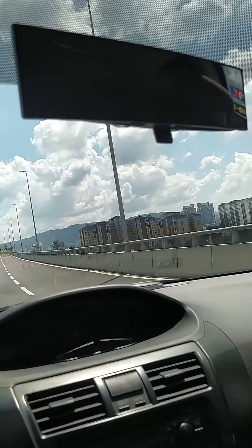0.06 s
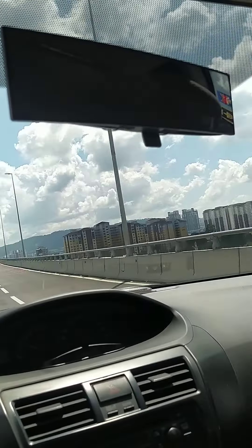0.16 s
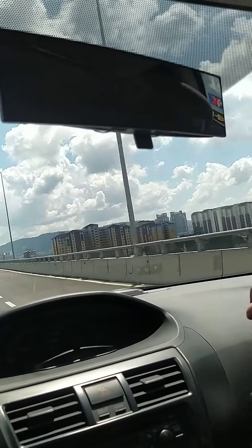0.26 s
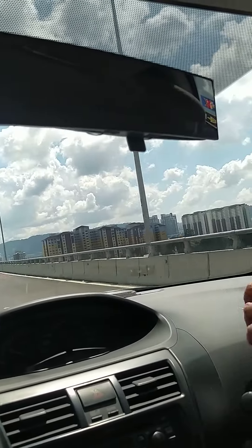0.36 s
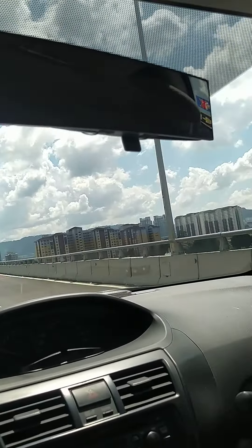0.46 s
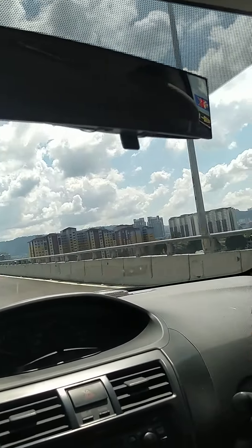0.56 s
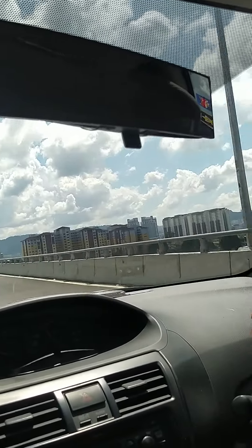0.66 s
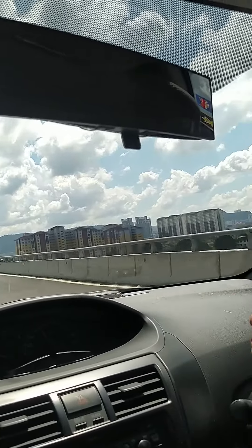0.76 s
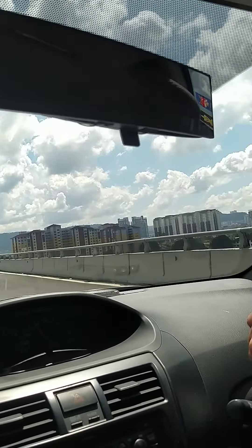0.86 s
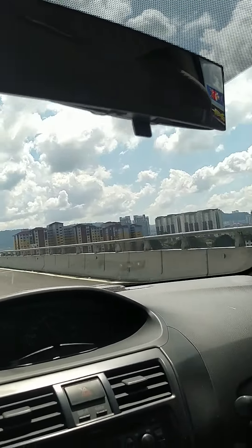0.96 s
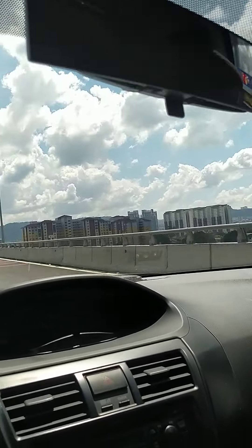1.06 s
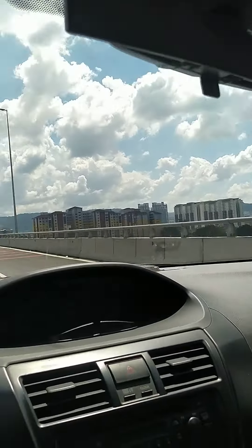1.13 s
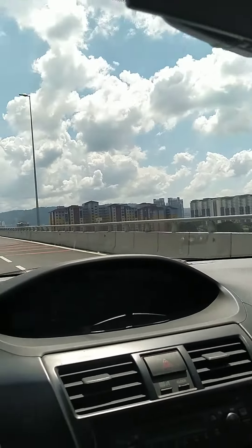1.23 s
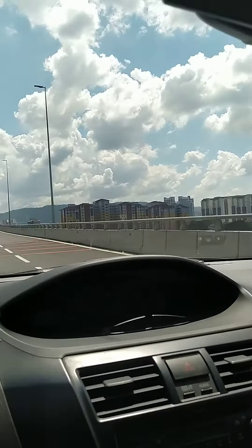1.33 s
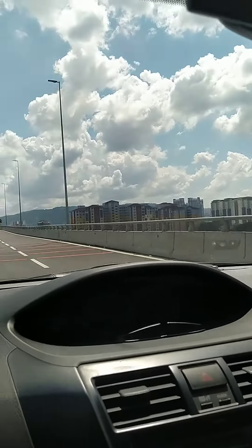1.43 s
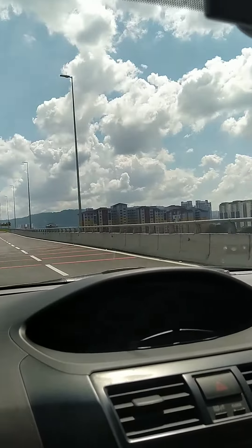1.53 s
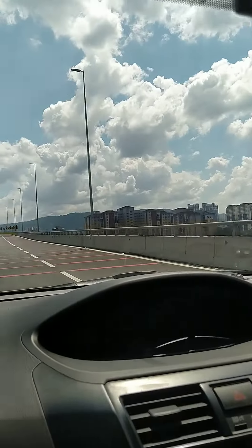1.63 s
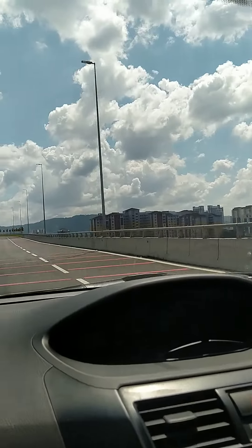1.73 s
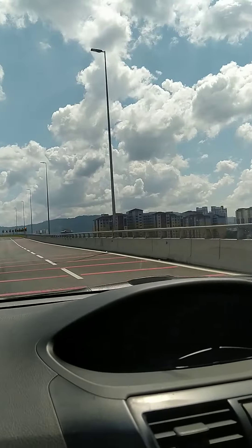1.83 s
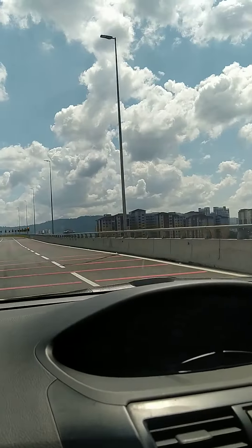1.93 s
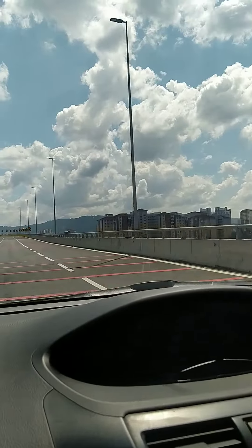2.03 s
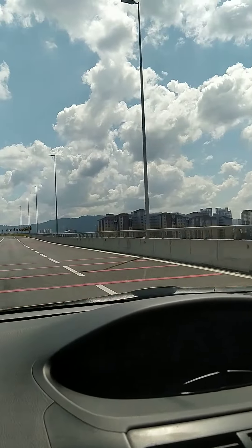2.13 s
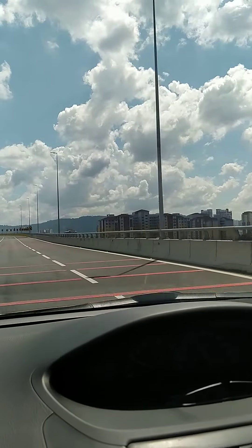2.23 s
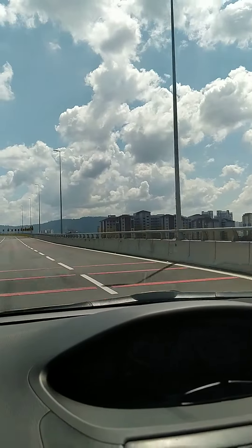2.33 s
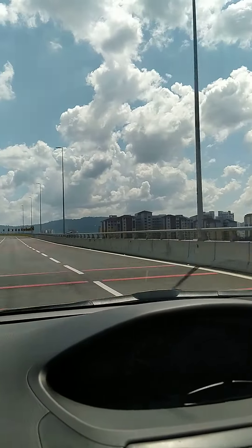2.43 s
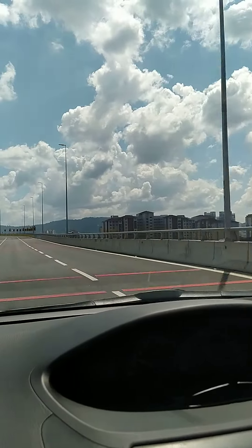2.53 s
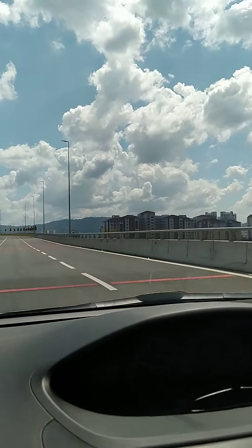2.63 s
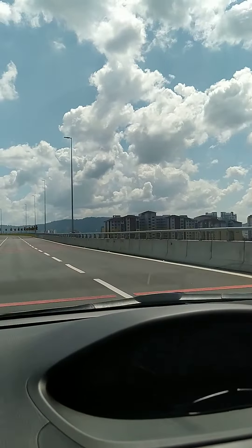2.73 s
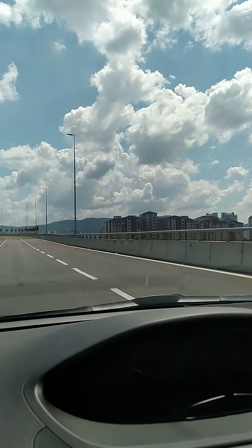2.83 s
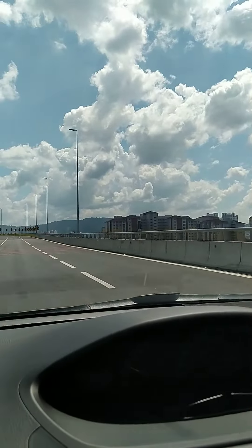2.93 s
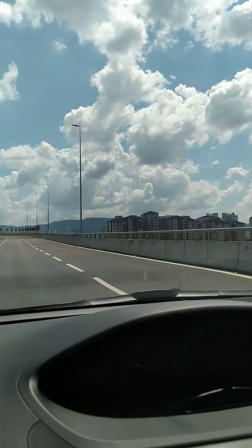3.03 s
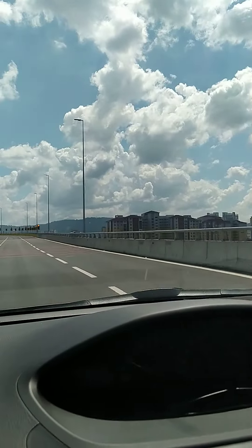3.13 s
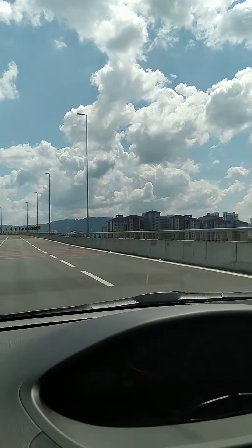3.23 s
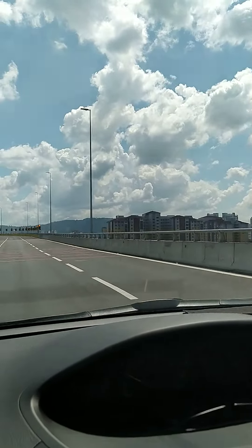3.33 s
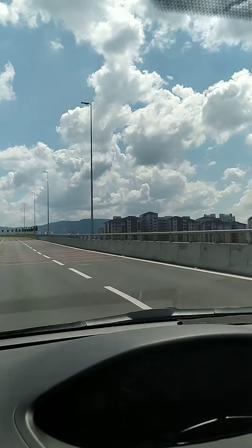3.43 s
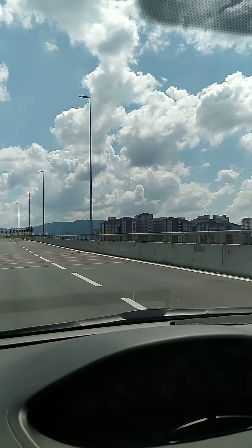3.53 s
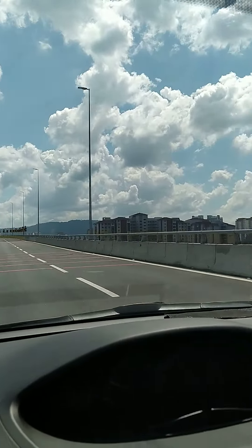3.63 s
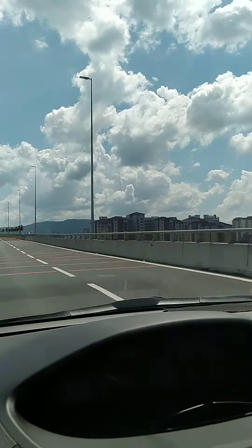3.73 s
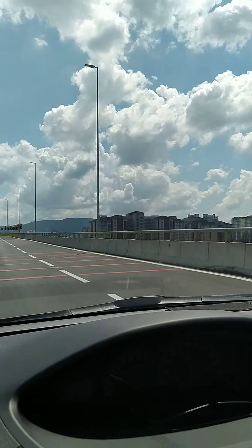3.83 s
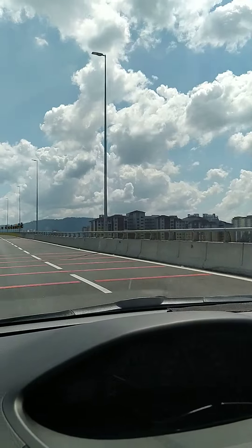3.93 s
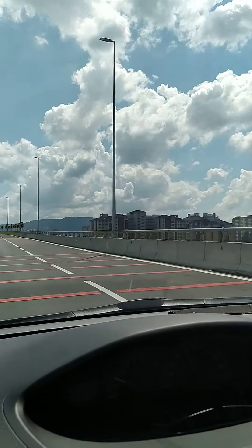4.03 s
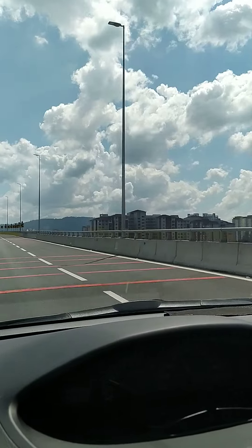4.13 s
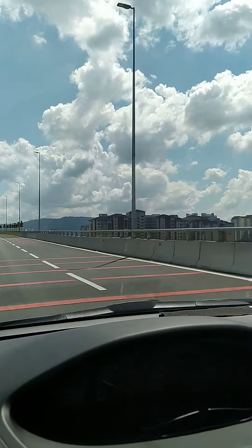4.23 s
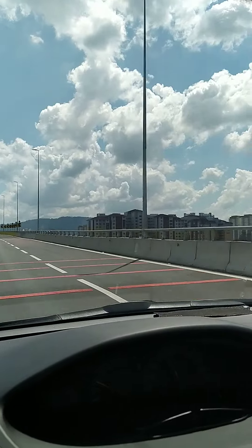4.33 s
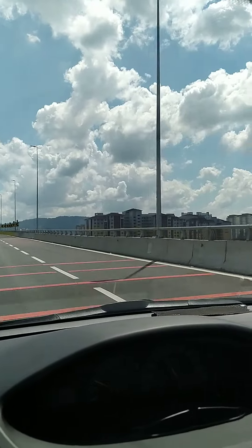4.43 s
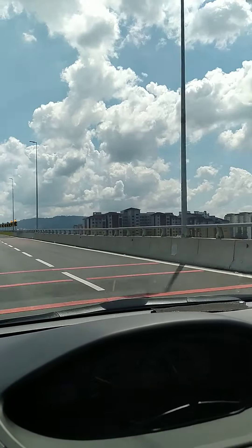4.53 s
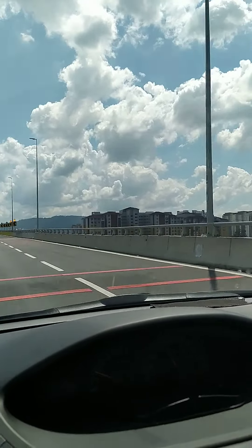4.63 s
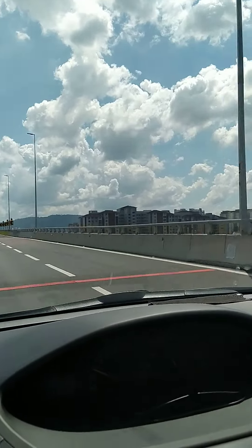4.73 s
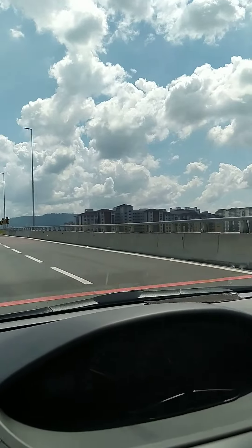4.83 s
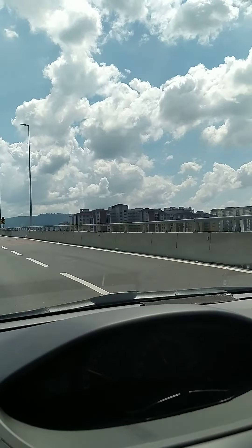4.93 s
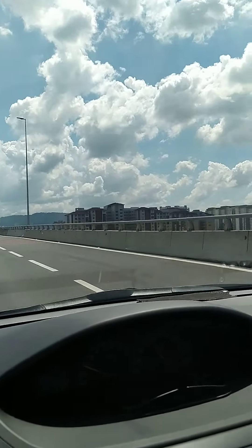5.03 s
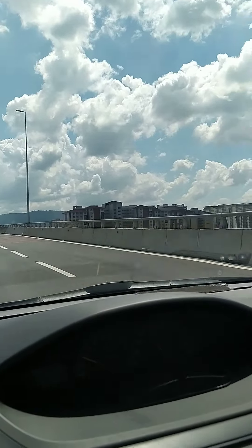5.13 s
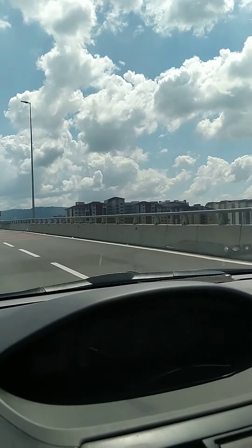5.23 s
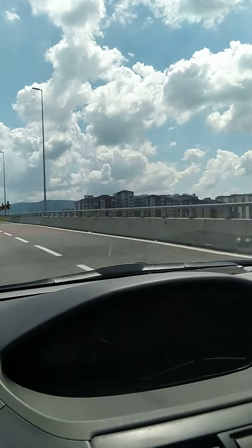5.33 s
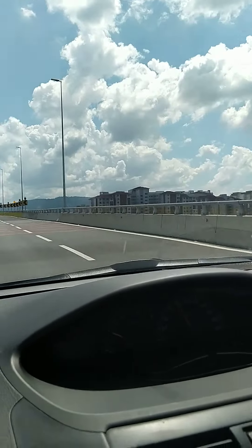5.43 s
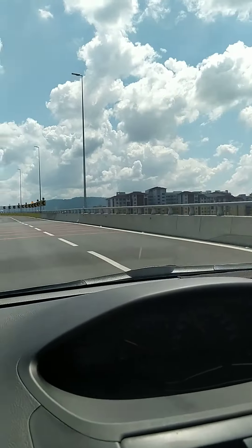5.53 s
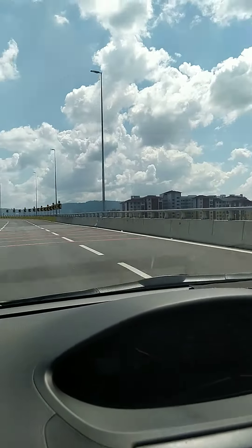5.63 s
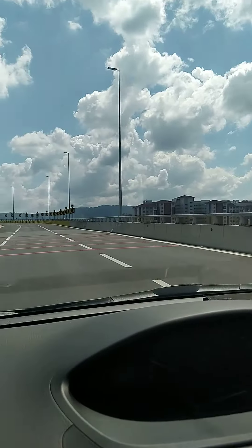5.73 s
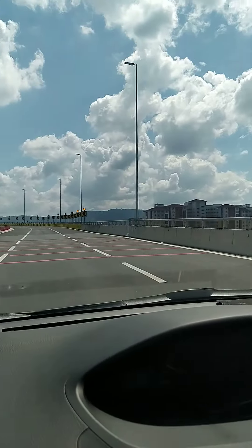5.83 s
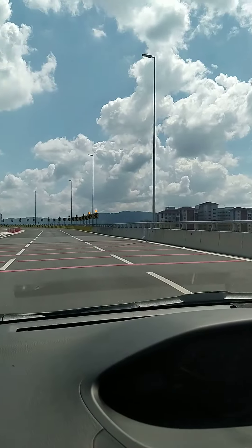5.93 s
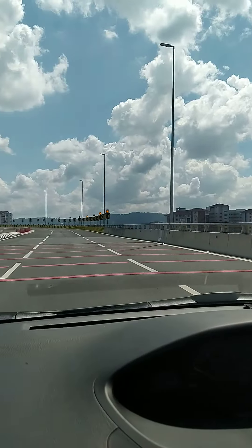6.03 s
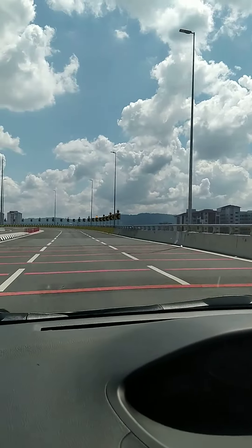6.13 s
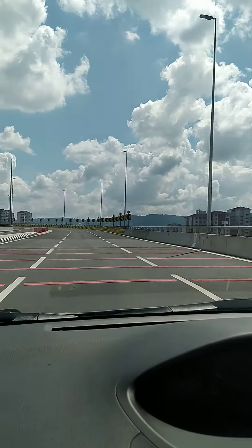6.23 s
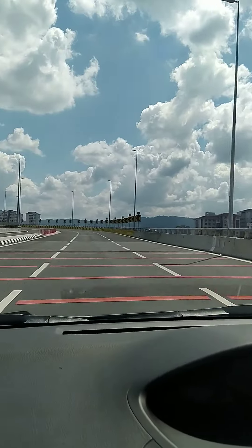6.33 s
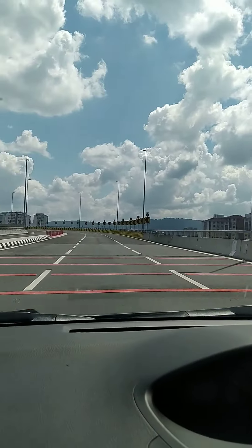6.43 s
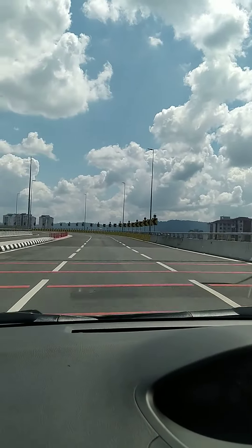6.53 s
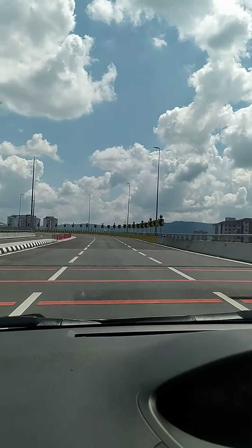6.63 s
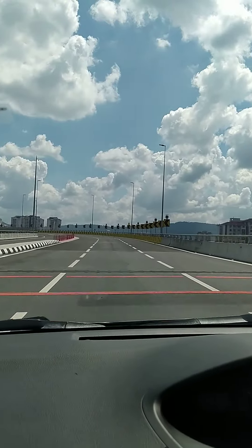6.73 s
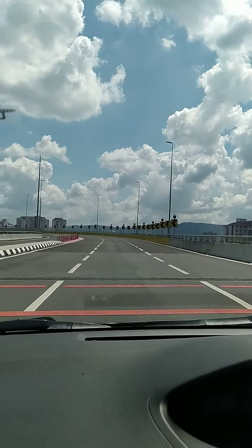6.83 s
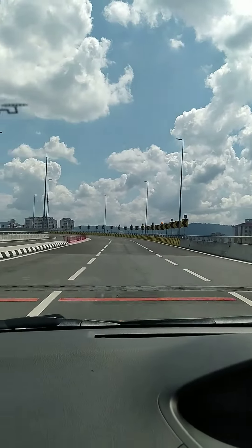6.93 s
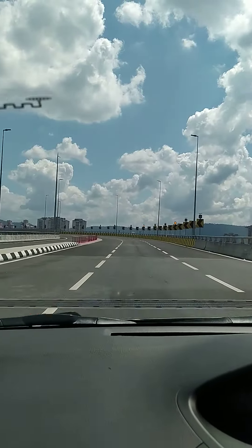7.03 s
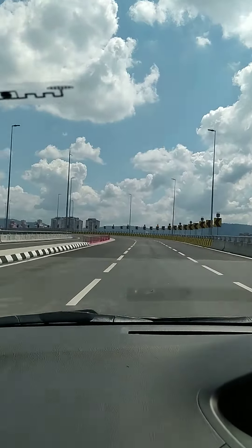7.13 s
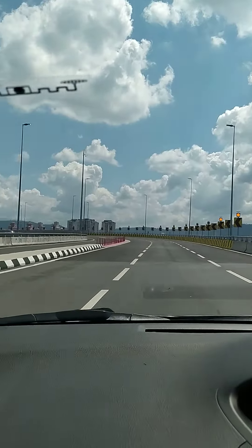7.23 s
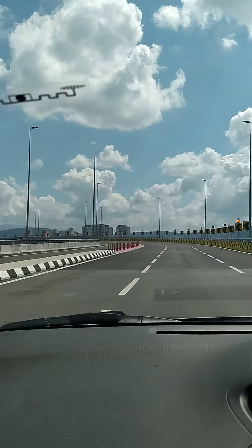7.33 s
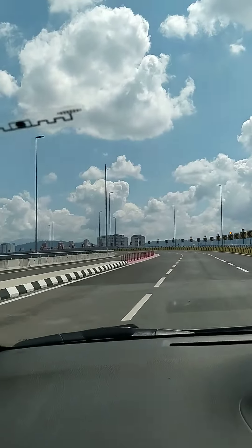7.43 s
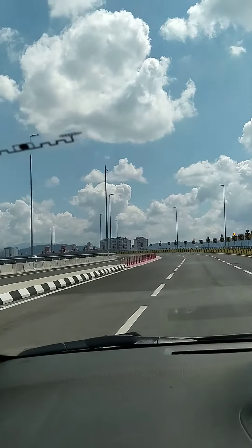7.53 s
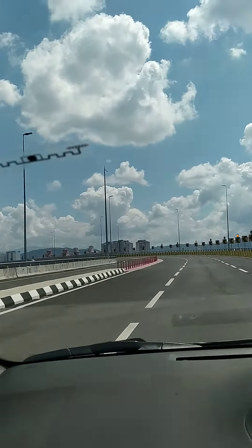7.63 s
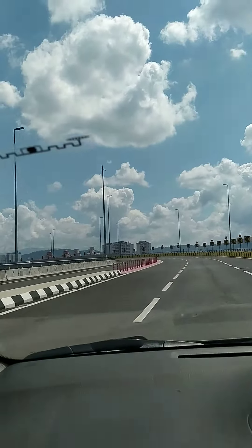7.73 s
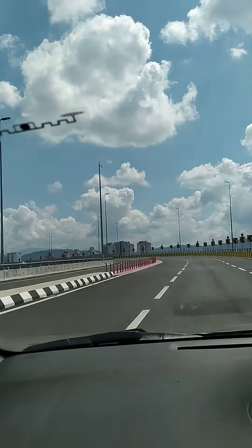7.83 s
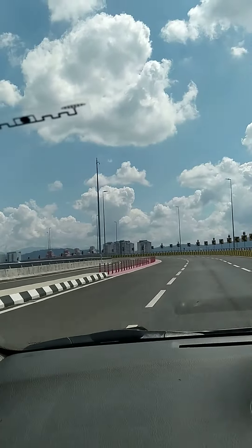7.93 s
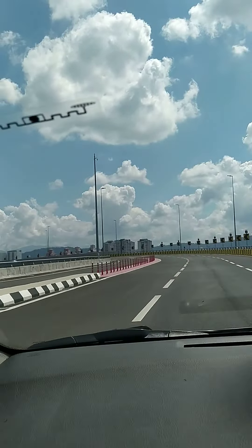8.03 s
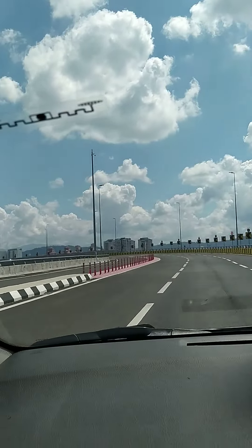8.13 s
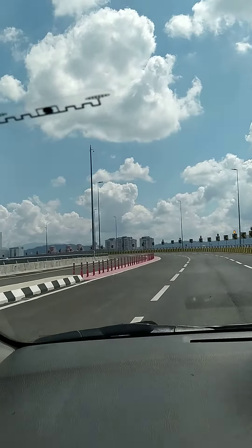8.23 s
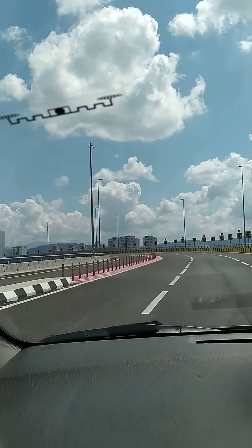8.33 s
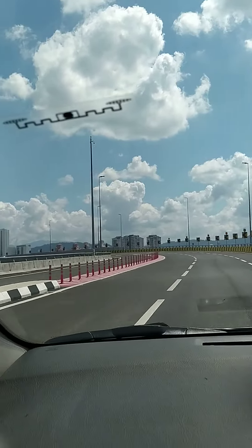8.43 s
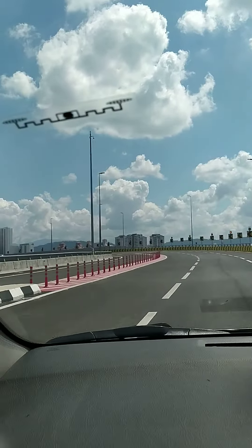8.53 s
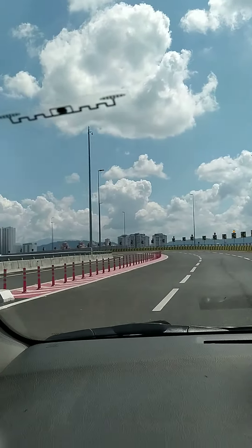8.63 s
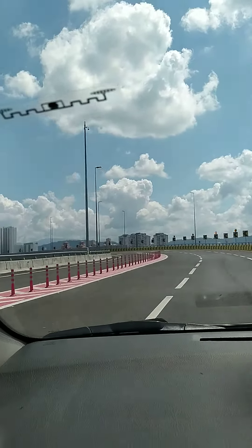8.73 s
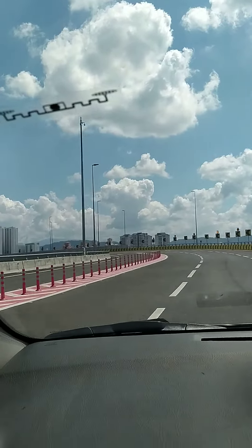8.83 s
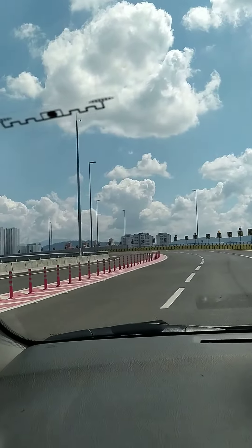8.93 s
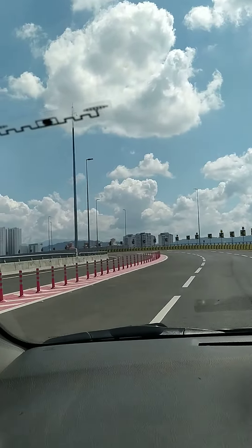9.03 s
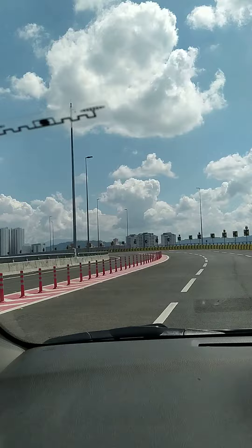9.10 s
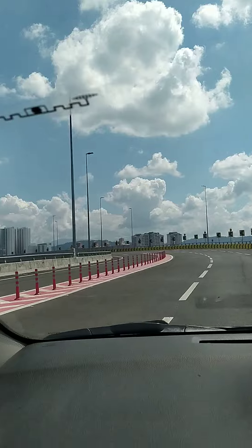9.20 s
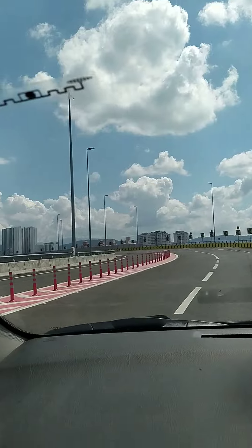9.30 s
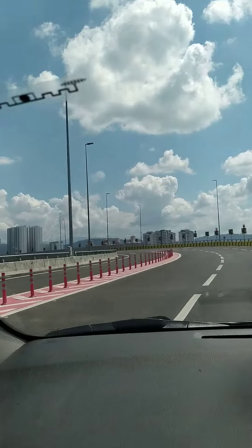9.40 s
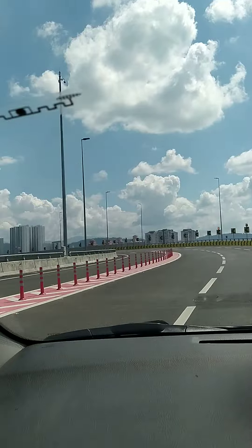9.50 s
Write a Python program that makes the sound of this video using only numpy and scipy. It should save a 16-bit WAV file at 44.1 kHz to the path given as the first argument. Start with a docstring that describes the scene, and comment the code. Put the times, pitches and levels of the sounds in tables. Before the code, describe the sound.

A closed car cabin on a highway, microphone near the dashboard. Soft rustles of handling begin over smooth road noise, which soon turns coarser. Three times the tyres drum rapidly across painted strips, front wheels slapping, rear wheels thudding, the body booming and plastic trim chattering. Between the bursts there is only steady roar, hum and hiss. A scrape and click precede the last set; a soft tick comes near the end.

```python
"""Tyres slap three sets of six painted rumble strips, heard inside a small car on a highway.
Each blow is shaped noise and fading tones: the front tyres knock and slap, the rear ones thump and thud.
Both make the body boom; loose trim rattles afterwards as bursts of noise.
Underneath run road roar and air hiss (noise), droning resonances, engine hum and a gear whine (sines).
Close by are rustles, a scrape that ends in a plastic click, and a soft tick (noise, with tones in the click)."""
import sys
import numpy as np
from scipy import signal
from scipy.fft import rfft, irfft
from scipy.io import wavfile
from scipy.ndimage import uniform_filter1d

SR = 44100
rng = np.random.default_rng(int(sys.argv[2]) if len(sys.argv) > 2 else 0)


def wrap_up_sound(samples):
    """Save the sound to the file named by the first command line argument, as 16-bit audio."""
    columns = np.atleast_2d(samples).T
    # keep every value between -1 and 1, then stretch to whole-number steps
    tamed = np.clip(columns, -1, 1)
    steps = np.round(tamed * 32767).astype(np.int16)
    wavfile.write(sys.argv[1], SR, steps)


N = 421596  # samples, about 9.56 s
TIME = np.arange(N) / SR


def undb(db):
    """Turn decibels into a gain."""
    return 10 ** (np.asarray(db) / 20)


def noise(size):
    """Two unrelated channels of white noise."""
    return rng.standard_normal((2, size))


def curves(table):
    """Join each column of a table by straight lines in time."""
    s, *columns = np.transpose(table)
    return [np.interp(TIME, s, column) for column in columns]


def ramp(s, fade_s):
    """Rise from 0 to 1 around a time."""
    return np.clip((TIME - s) / fade_s + .5, 0, 1)


def walk(rate_hz):
    """A wandering level: random steps smoothed twice, with a spread of 1."""
    step = int(SR / rate_hz)
    held = np.repeat(rng.standard_normal(N // step + 1), step)
    smooth = uniform_filter1d(uniform_filter1d(held, step), step)[:N]
    return smooth / smooth.std()


def log_frequency(size):
    """Logarithm of each spectrum frequency, because pitch is heard in ratios."""
    return np.log(np.maximum(np.fft.rfftfreq(size, 1 / SR), 1))


def colour(x, points):
    """Shape a sound by a spectrum with steep ends; white noise keeps its power."""
    hz, db = np.transpose(points)
    f = log_frequency(x.shape[-1])
    outside = np.abs(f - np.clip(f, np.log(hz[0]), np.log(hz[-1])))
    gain = undb(np.interp(f, np.log(hz), db)) * np.exp(-10 * outside)
    gain = gain / np.sqrt(np.mean(gain ** 2))
    return irfft(rfft(x) * gain, x.shape[-1])


def lows(x, top_hz):
    """Keep what lies below a frequency, without delaying it."""
    return signal.sosfiltfilt(signal.butter(2, top_hz, fs=SR, output="sos"), x)


def fade(t, t60):
    """Die away by 60 dB in t60 seconds."""
    return np.exp(-np.log(1000) * t / t60)


def add(out, sound, s):
    """Mix a sound in at a time."""
    start = int(s * SR)
    part = sound[..., :N - start]
    out[..., start:start + part.shape[-1]] += part


def ring(modes, detune):
    """One second of fading tones, as from a struck object; pitches differ a little at every blow."""
    t = TIME[:SR]
    out = np.zeros(SR)
    for hz, db, t60 in modes:
        pitch_hz = hz * (1 + detune * rng.standard_normal())
        out += undb(db - 60 * t / t60) * np.sin(2 * np.pi * pitch_hz * t)
    return out


DRONE_WIDTH_HZ = 5
# narrow resonances of tyres and cabin that the asphalt keeps droning: (frequency [Hz], level [dB])
DRONES = [(102, -40), (158, -40.5), (222, -47.5), (243, -42), (286, -45.5), (370, -48)]


def drones():
    """Narrow bands of noise, like resonances kept going by the road, each swelling and fading on its own."""
    f = np.fft.rfftfreq(N, 1 / SR)
    power = 0
    for hz, db in DRONES:
        peak = 1 / (1 + ((f - hz) / DRONE_WIDTH_HZ) ** 2) ** 2
        power = power + undb(db) ** 2 * peak / peak.mean()
    return irfft(rfft(noise(N)) * np.sqrt(power), N)


ROAD_DB, AIR_DB = -26.5, -53.5  # base levels
ASPHALT_S, ASPHALT_FADE_S = 2.2, 1  # the road turns coarser here
SMOOTH_RUMBLE_DB, SMOOTH_ROAR_DB, SMOOTH_DRONE_DB = -2, -2, -5  # on the smooth stretch before it
BEND_S, BEND_FADE_S, BEND_ROAR_DB = 8.34, 0.21, 2  # steering into the bend loads the tyres
# tone of the road and tyre noise: (frequency [Hz], relative level per Hz [dB])
ROAD = [(18, 3.5), (27, -0.5), (45, 1), (72, -7.5), (92, -8.5), (120, -3), (145, -10.5), (185, -6),
        (215, -10.5), (260, -12.5), (330, -17.5), (580, -25), (820, -26.5), (1300, -35.5), (2500, -49)]
# tone of the air hiss: (frequency [Hz], relative level per Hz [dB])
AIR = [(1470, 6), (2500, 2), (3440, -3.5), (4270, -2.5), (5120, -7), (9660, -1.5), (11400, -15.5),
       (13600, -22), (15500, -43)]


def road():
    """Asphalt rumbles through the suspension, the tread roars above it and air hisses almost steadily."""
    smooth, bend = 1 - ramp(ASPHALT_S, ASPHALT_FADE_S), ramp(BEND_S, BEND_FADE_S)
    tyres = undb(ROAD_DB) * colour(noise(N), ROAD)
    low = lows(tyres, 340)
    rumble = low * undb(SMOOTH_RUMBLE_DB * smooth - 1.4 + 1.1 * walk(11))
    roar_db = SMOOTH_ROAR_DB * smooth + BEND_ROAR_DB * bend + 1.13 + .5 * walk(14)
    roar = (tyres - low) * undb(roar_db)
    # in the bend the loaded tread roars more around a kilohertz
    scrub = bend * undb(-48) * colour(noise(N), [(700, 6), (1030, 4), (1600, -25)])
    air = colour(noise(N), AIR) * undb(AIR_DB - 0.22 + .5 * walk(2.88))
    return rumble + roar + scrub + air + drones() * undb(SMOOTH_DRONE_DB * smooth)


# engine speed and loudness: (time [s], firing rate [Hz], base hum level [dB])
ENGINE = [(0, 59.5, -38), (.8, 60.6, -36.5), (1.4, 61.7, -32.5), (2.3, 61.7, -31.5), (3.8, 61.7, -46),
          (5.4, 61.7, -38), (6.3, 62.2, -37), (8.2, 59.2, -35), (9.56, 59.2, -36)]
# tones that make up the hum: (multiple of the firing rate, relative level [dB])
ENGINE_ORDERS = [(1, -8), (2, 0), (3, -2.5), (4, -13)]


def engine():
    """Regular firing makes a stack of harmonics; the gear whine is locked to the same turning."""
    firing_hz, hum_db = curves(ENGINE)
    phase = 2 * np.pi * np.cumsum(firing_hz * (1 + .001 * walk(6))) / SR
    hum = sum(undb(hum_db + db + walk(2.94)) * np.sin(k * phase) for k, db in ENGINE_ORDERS)
    return hum + gear_whine(phase)


WHINE_ORDER = 13  # gear teeth per firing
# the whine swells once under load: (time [s], level [dB])
WHINE = [(0, -58), (.55, -51), (.95, -48), (1.35, -45), (1.7, -45), (1.95, -48), (2.3, -52), (2.6, -70)]


def gear_whine(phase):
    """Meshing teeth sing one thin tone, a little unsteady in pitch and level."""
    whine_db, = curves(WHINE)
    tone = np.sin(WHINE_ORDER * phase + .6 * walk(35))
    return tone * undb(whine_db + 2 * walk(25))


# when something rustles: (time [s], time from the middle until it has faded to 37 % [s], level [dB])
RUSTLES = [(0.051, 0.03, -50.5), (0.085, 0.0073, -48), (0.182, 0.12, -54.5), (4.162, 0.046, -49),
           (7.239, 0.024, -43)]
# tone of the rustles: (frequency [Hz], relative level per Hz [dB])
RUSTLE_TONE = [(3000, -8), (4500, -6), (6500, -3.5), (9500, 3), (11500, -9), (15000, -30)]


def rustles():
    """Short dry rubbing close by: noise that flutters quickly in level."""
    rub = sum(undb(db) * np.exp(-((TIME - s) / length_s) ** 2) for s, length_s, db in RUSTLES)
    return colour(noise(N) * rub * undb(1.6 * walk(430)), RUSTLE_TONE)


# sets of evenly spaced strips: (time the front tyres meet the first [s], time between strips [s])
STRIP_SETS = [(2.454, .158), (4.545, .1563), (6.637, .1567)]
# how hard the paint of each set is struck: (knock level [dB], slap level [dB], rear blow level [dB])
BLOWS = [(-21.5, -16.5, 1), (-21.5, -15.5, 1), (-23, -17, 1.2)]
# how hard each strip shakes the trim, one row per set: (level at first [dB], ... level at sixth [dB])
SHAKE = [(-29.5, -31, -31.5, -31, -26, -32), (-37.5, -30.5, -31.5, -32.5, -32.5, -31.5),
         (-34, -33.5, -29, -32, -30, -33)]


def crossings():
    """List every strip: (time [s], knock [dB], slap [dB], rear blow [dB], trim shake [dB])."""
    strips_met = []
    for (first_s, gap_s), blow, shakes in zip(STRIP_SETS, BLOWS, SHAKE):
        for k, shake_db in enumerate(shakes):
            strips_met.append((first_s + k * gap_s, *blow, shake_db))
    return strips_met


# rough part of a tyre knock: (frequency [Hz], relative level per Hz [dB])
KNOCK_TONE = [(400, -9), (530, -8), (720, 6.5), (880, -1), (1050, -10), (1350, -11), (2200, -26)]
# hollow ring of the wheel arch: (frequency [Hz], relative level [dB], time to fade by 60 dB [s])
ARCH = [(672, -2, .08), (764, 0, .075)]


def knock(t60=0.092, grip_s=0.0032, rough_db=-4, arch_db=-2):
    """The tread wraps round the edge of the paint in a rough knock and the wheel arch rings hollow."""
    t = TIME[:SR]
    out = undb(rough_db) * colour(noise(SR), KNOCK_TONE) * fade(t, t60)
    out[0] += undb(arch_db) * ring(ARCH, detune=.04)
    return out * (1 - np.exp(-t / grip_s))


def panels(path, spectrum, contact_s, rise_s, low_t60, high_t60, alike):
    """Many panel resonances heard as noise, partly the same each time; lows and highs rise and fade apart."""
    t = TIME[:SR]
    mixed = np.sqrt(alike) * path + np.sqrt(1 - alike) * noise(SR)
    dense = colour(mixed, spectrum)
    low = lows(dense, 330)
    swell = 1 - np.exp(-t / rise_s)
    soft_rubber = 1 - np.exp(-(t / contact_s) ** 2)
    return low * fade(t, low_t60) * swell + (dense - low) * fade(t, high_t60) * soft_rubber


def thump(s, hz):
    """One push of air with a rebound on either side."""
    squash = (np.pi * hz * (TIME[:SR] - s)) ** 2
    return (1 - 2 * squash) * np.exp(-squash)


AXLE_LAG_S = .143  # the rear tyres follow this much later: wheelbase over speed
THUMP_S, THUMP_HZ, THUMP_DB = 0.004, 80, -9  # a rear tyre squashes and springs back: delay, pitch, level
THUD_S = .014  # the rear suspension passes the blow on to the panels this much later
# low resonances of body, cabin air and tyre cavity:
# (frequency [Hz], relative level [dB], time to fade by 60 dB [s])
BODY = [(25.23, -7, 0.61), (38.87, -11, 0.53), (50.7, -17.5, 0.79), (77.05, -28, 1), (103, -23.5, 0.18),
        (115, -23.5, 0.24), (153.7, -22.5, 0.88), (188, -26.5, 0.42), (243.8, -22.5, 0.44),
        (372, -29.5, 0.32), (415.4, -31, .35), (476.6, -35.5, 0.55)]
# tone of the front slap: (frequency [Hz], relative level per Hz [dB])
SLAP_TONE = [(60, 12), (130, 1), (190, 10.5), (222, 0.5), (255, 6.5), (330, -1.5), (420, -3.5), (530, -8),
             (760, -16), (1000, -25), (1600, -30.5), (4000, -43)]
# tone of the rear thud: (frequency [Hz], relative level per Hz [dB])
THUD_TONE = [(45, 0), (75, 3.5), (105, 7.5), (155, 1), (195, 3.5), (222, -5.5), (290, -8.5), (450, -14.5),
             (700, -19.5), (1200, -28), (3000, -45.5)]
# a front tyre knocks climbing onto the paint and again dropping off: (delay [s], relative level [dB])
EDGES = [(-.002, 0), (.0215, -3)]


def strips(build_s=0.019):
    """The front axle strikes each strip, then the rear one thumps it; both set the body booming."""
    out = np.zeros((2, N))
    front_path, rear_path = noise(SR), noise(SR)
    build = 1 - np.exp(-TIME[:SR] / build_s)  # the springs pass the blow on gradually
    rear_thump = thump(AXLE_LAG_S + THUMP_S, THUMP_HZ)
    for s, knock_db, slap_db, rear_db, _ in crossings():
        slap = panels(front_path, SLAP_TONE, contact_s=0.00028, rise_s=0.013,
                      low_t60=0.79, high_t60=0.25, alike=0.46)
        thud = panels(rear_path, THUD_TONE, contact_s=0.014, rise_s=0.019,
                      low_t60=0.67, high_t60=0.79, alike=0.35)
        boom = build * ring(BODY, detune=0.0079)
        # front axle
        add(out, undb(slap_db - 2.5) * slap, s)
        for delay_s, db in EDGES:
            add(out, undb(knock_db + db) * knock(), s + delay_s)
        add(out[0], undb(-9.5) * boom, s + 0.00485)
        # rear axle; its lag is already inside the thump
        add(out[0], undb(rear_db + THUMP_DB) * rear_thump, s)
        add(out, undb(rear_db - 16) * thud, s + AXLE_LAG_S + THUD_S)
        add(out[0], undb(rear_db + 1.5) * boom, s + AXLE_LAG_S + 0.0178)
    return out


CHATTER_S = 0.041  # the trim chatters hardest this long after a rear blow
KNOCK_RISE_S = .002  # loose trim seats itself over this time
TRIM_DRY_DB, TRIM_RING_DB = -2.3, -10  # direct and through the cabin
# separate knocks of loose trim, set off by the strips: (time [s], level [dB])
TRIM_KNOCKS = [(2.486, -34), (2.634, -29), (2.653, -26), (2.683, -33), (2.712, -34), (2.723, -32),
               (2.791, -19.5), (2.806, -23), (2.834, -32), (2.955, -30), (2.964, -26), (3.036, -33.5),
               (3.108, -26.5), (3.124, -23.5), (3.196, -33), (3.244, -44), (3.264, -34), (3.284, -20.5),
               (3.304, -22), (3.323, -25), (3.353, -27), (3.422, -25), (3.435, -28), (3.464, -33),
               (4.88, -33), (4.899, -24), (4.931, -32), (4.941, -35), (4.972, -28), (5.04, -21.5),
               (5.052, -24.5), (5.086, -31.5), (5.212, -25), (5.276, -32.5), (5.351, -38), (5.364, -30),
               (5.397, -34.5), (5.52, -22.5), (5.544, -31), (6.816, -29), (6.984, -24), (7.044, -33.5),
               (7.127, -33), (7.142, -26), (7.281, -26), (7.298, -26.5), (7.369, -34), (7.440, -31),
               (7.46, -24), (7.609, -30)]
# tone of the trim: (frequency [Hz], relative level per Hz [dB])
TRIM_TONE = [(530, 6.5), (900, 3), (1060, -1.5), (1330, 0.5), (1880, -7.5), (2170, -3), (3340, -11),
             (4180, -12.5), (5570, -15), (8250, -15), (9400, -10.5), (11400, -27.5), (15500, -48)]


def rattles(swell_s=0.026, fade_s=0.064, grain_db=5, contacts_per_s=1100, knock_s=0.0096, ring_t60=0.045):
    """Loose trim chatters after every strip and knocks home in sharp cracks; the cabin adds a short ring."""
    chatter, knocks, size = np.zeros(N), np.zeros(N), SR // 2  # both hold power, not level
    t = TIME[:size] - TIME[size // 4]
    swell = np.exp(np.minimum(t / swell_s, -t / fade_s))
    for s, *_, shake_db in crossings():
        add(chatter, (undb(shake_db) * swell) ** 2, s + AXLE_LAG_S + CHATTER_S + t[0])
    for s, db in TRIM_KNOCKS:
        add(knocks, (undb(db) * np.exp(-TIME[:size] / knock_s)) ** 2, s)
    knocks = uniform_filter1d(knocks, int(KNOCK_RISE_S * SR))
    # the chatter is made of many tiny contacts of random strength
    strength = undb(grain_db * rng.standard_normal(N)) ** 2
    contacts = (rng.random(N) < contacts_per_s / SR) * strength
    grain = signal.lfilter([1], [1, -np.exp(-1 / (0.0018 * SR))], contacts)
    power = np.abs(chatter * grain / grain.mean() + knocks)
    direct = noise(N) * np.sqrt(power)
    walls = noise(size) * fade(TIME[:size], ring_t60)
    walls = walls / np.linalg.norm(walls[0])
    ringing = signal.fftconvolve(direct, walls, axes=1)[:, :N]
    return colour(undb(TRIM_DRY_DB) * direct + undb(TRIM_RING_DB) * ringing, TRIM_TONE)


SCRAPE_S, SCRAPE_LENGTH_S, SCRAPE_DB = 6.587, 0.013, -35  # plastic slides just before it clicks
# tone of the scrape: (frequency [Hz], relative level per Hz [dB])
SCRAPE_TONE = [(2800, -6), (4100, 0), (5200, -8), (6600, -23), (8200, 3), (9900, 1), (11200, -11),
               (15000, -23)]


def scrape(slips_per_s=1000, slip_s=.001):
    """Plastic sticks and slips in a quick, uneven run of tiny ticks."""
    gaps, sizes = rng.standard_normal((64, 2)).T
    times = np.cumsum(undb(2 * gaps)) / slips_per_s
    times = SCRAPE_S + times - times.mean()
    slips = np.zeros(N)
    for s, db in zip(times, 2 * sizes):
        add(slips, undb(db) * np.exp(-TIME[:SR // 10] / slip_s), s)
    pressure = undb(SCRAPE_DB) * np.exp(-((TIME - SCRAPE_S) / SCRAPE_LENGTH_S) ** 2)
    return colour(noise(N) * slips * pressure, SCRAPE_TONE)


# the plastic catches, then snaps home: (time [s], level [dB])
CLICKS = [(6.6055, -30), (6.608, -26.5)]
# tones of the plastic: (frequency [Hz], relative level [dB], time to fade by 60 dB [s])
PLASTIC = [(1520, -3, .025), (3050, -1, .055), (5900, 0, .014), (7750, -9, .05), (9400, -3, .035)]
# tone of the sharp crack: (frequency [Hz], relative level per Hz [dB])
CRACK_TONE = [(1200, -5), (3100, 9), (4500, -5), (6000, -5), (7000, -18), (9400, 8), (11500, -7),
              (15000, -18)]


def plastic_click():
    """Plastic snaps near the microphones: a crack of noise, and the piece rings briefly."""
    out = np.zeros((2, N))
    for s, db in CLICKS:
        crack = colour(noise(SR), CRACK_TONE) * np.exp(-TIME[:SR] / .003)
        body = np.array([ring(PLASTIC, detune=0.0062) for channel in range(2)])
        add(out, undb(db) * (undb(-5) * body + crack), s)
    return out


TICK_S, TICK_DB = 9.416, -39
# tone of the tick: (frequency [Hz], relative level per Hz [dB])
TICK_TONE = [(1400, 1), (2400, 1), (3300, -12), (7000, -22)]


def trim_tick():
    """A piece of trim ticks softly in the bend: one quickly fading burst of noise."""
    out = np.zeros((2, N))
    tick = colour(noise(SR), TICK_TONE) * np.exp(-TIME[:SR] / 0.0067)
    add(out, undb(TICK_DB) * tick, TICK_S)
    return out


# the cabin at the two microphones:
# (frequency [Hz], side minus middle level [dB], left minus right level [dB])
WIDTH = [(30, -18, 0.5), (90, -25, -1.3), (181, -19.5, -1), (366, -7, -2.5), (725, -4, 1.5),
         (1400, 0.5, 1.7), (2800, 0.5, .2), (6040, 0, 0.5), (10600, 0, -5.5)]


def cabin(pair):
    """Sound arrives from all around: left and right are alike in the bass and apart in the treble."""
    hz, side_db, pan_db = np.transpose(WIDTH)
    f = log_frequency(N)
    side_gain = undb(np.interp(f, np.log(hz), side_db))
    pan = undb(np.interp(f, np.log(hz), pan_db / 2))
    middle, side = rfft(pair)
    left = (middle + side_gain * side) * pan
    right = (middle - side_gain * side) / pan
    return irfft(np.array([left, right]), N)


def scene():
    """Everything reaches the microphones through the closed cabin."""
    pair = road() + rustles() + strips() + rattles() + scrape() + plastic_click() + trim_tick()
    pair[0] += engine()  # the first channel is the middle, the second the side
    return cabin(pair)


TOP_HZ = 15450  # nothing much passes above this


def record(dry, ceiling=1.0, knee_db=-17, squeeze=0.72, follow_s=0.018):
    """The phone holds down heavy bass, rounds the loudest peaks and cuts the top."""
    bass = lows(dry, 110)
    loudness = np.sqrt(np.abs(uniform_filter1d(bass[0] ** 2, int(follow_s * SR))))  # left channel
    gain = np.maximum(loudness / undb(knee_db), 1) ** -squeeze
    rounded = ceiling * np.tanh((dry + (gain - 1) * bass) / ceiling)
    fade_in = np.minimum(TIME / .003, 1)
    top_cut = signal.ellip(8, .2, 70, TOP_HZ, fs=SR, output="sos")
    return signal.sosfilt(top_cut, fade_in * rounded)


dry = scene()
out = record(dry)
wrap_up_sound(out)
```